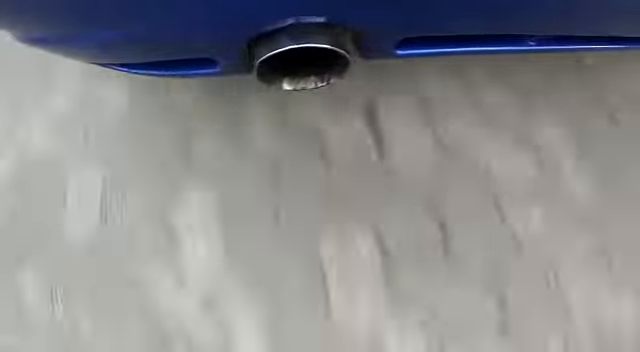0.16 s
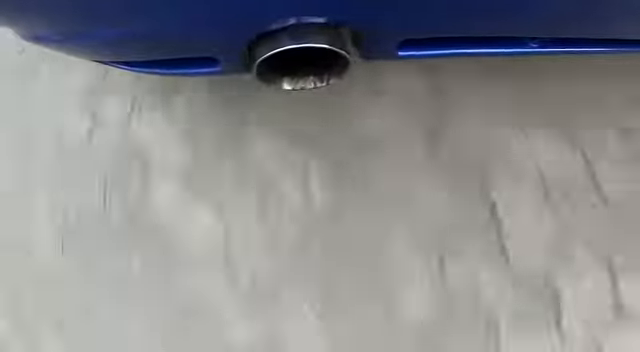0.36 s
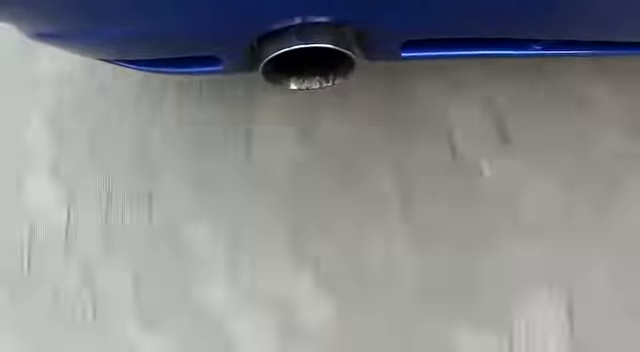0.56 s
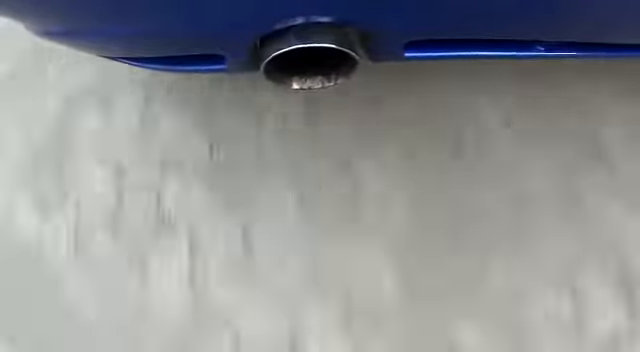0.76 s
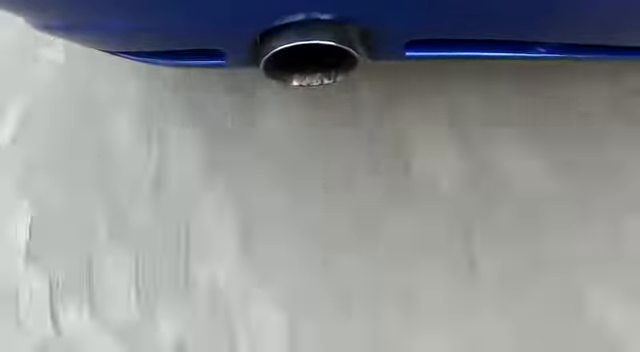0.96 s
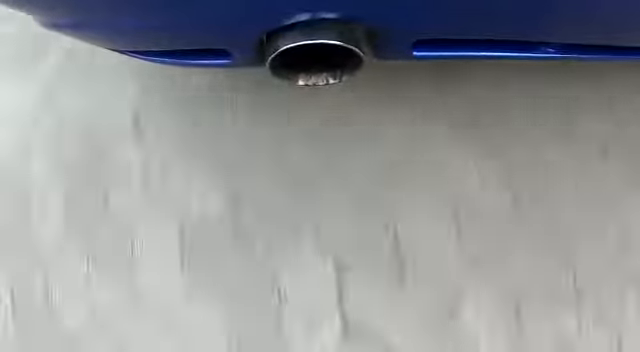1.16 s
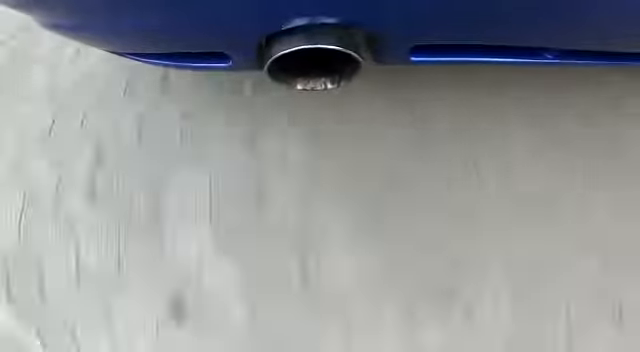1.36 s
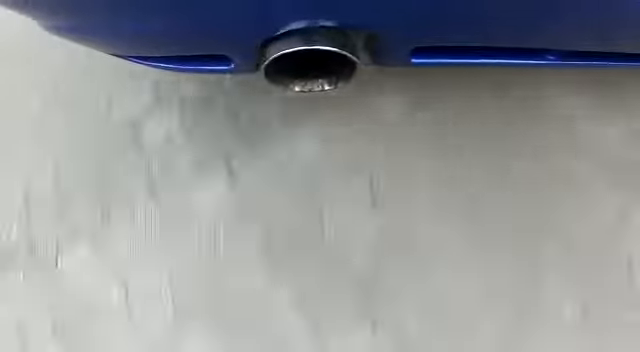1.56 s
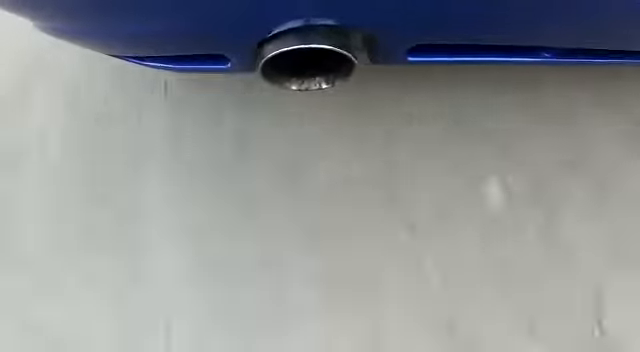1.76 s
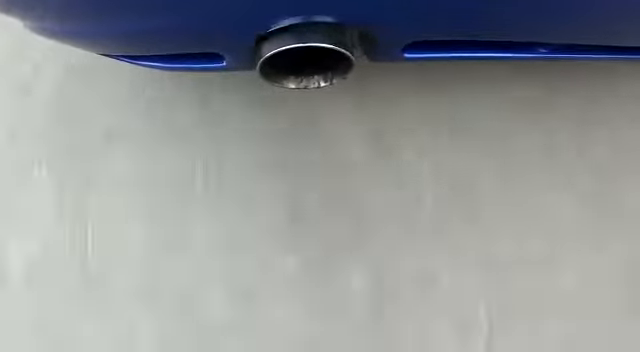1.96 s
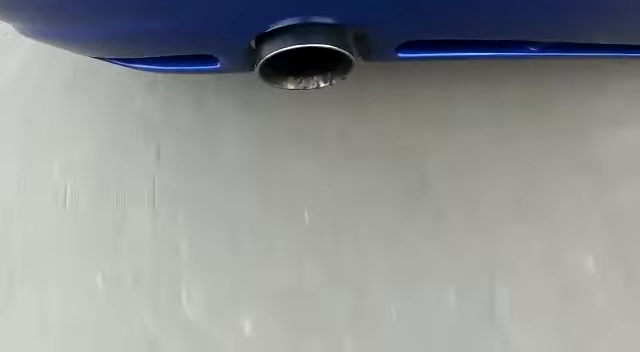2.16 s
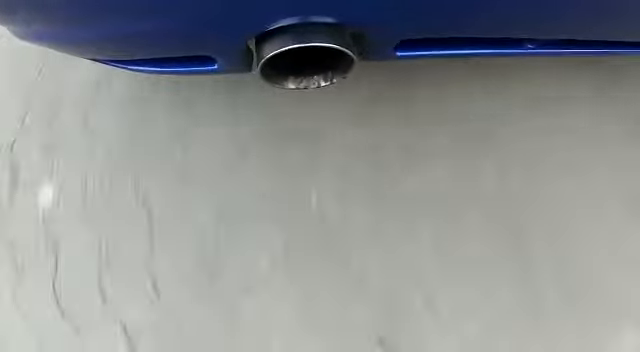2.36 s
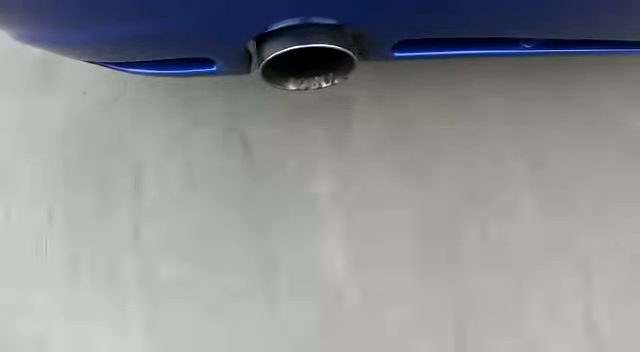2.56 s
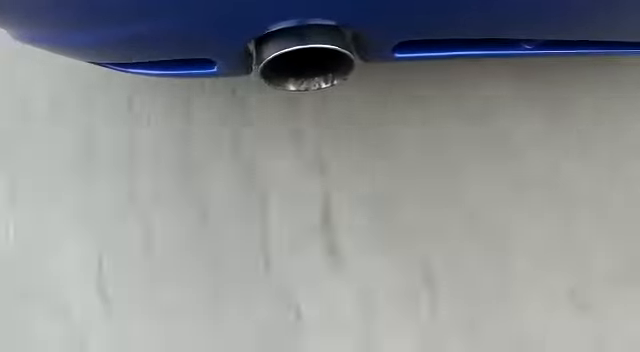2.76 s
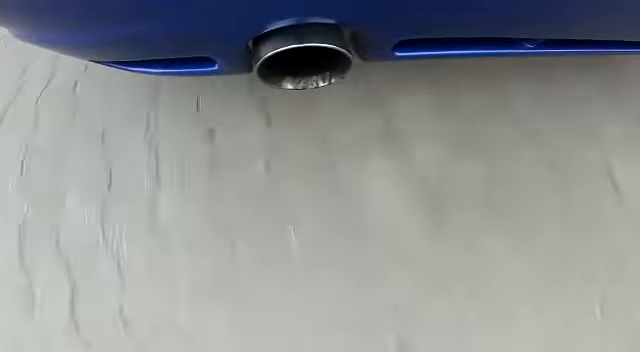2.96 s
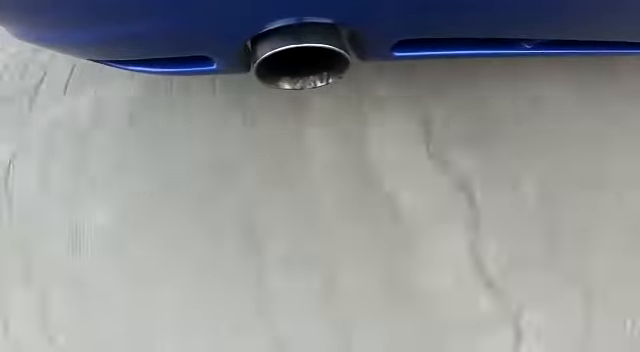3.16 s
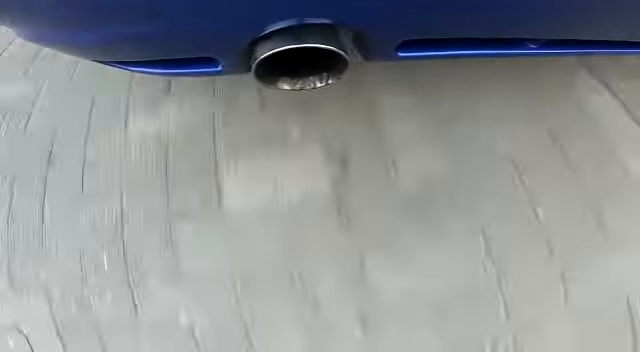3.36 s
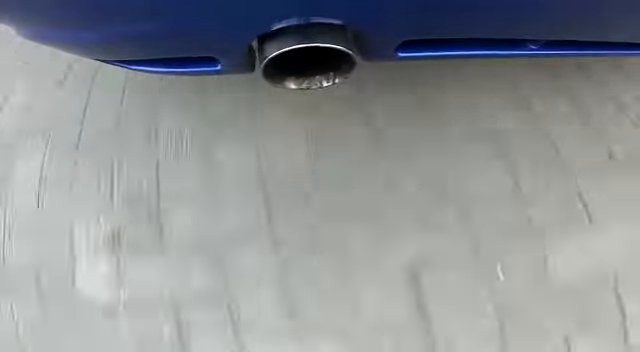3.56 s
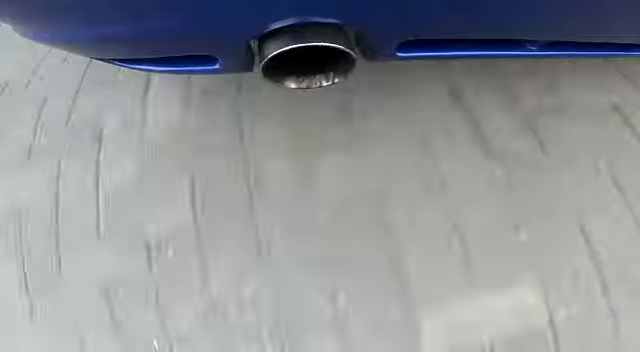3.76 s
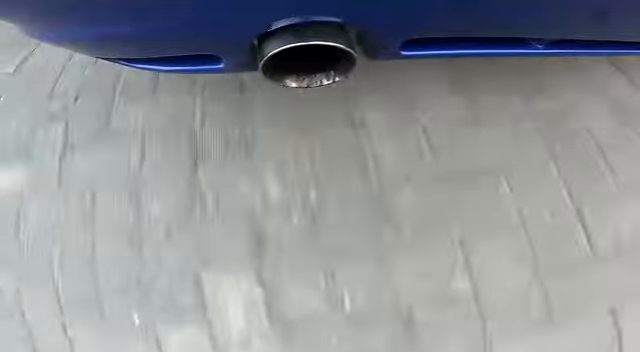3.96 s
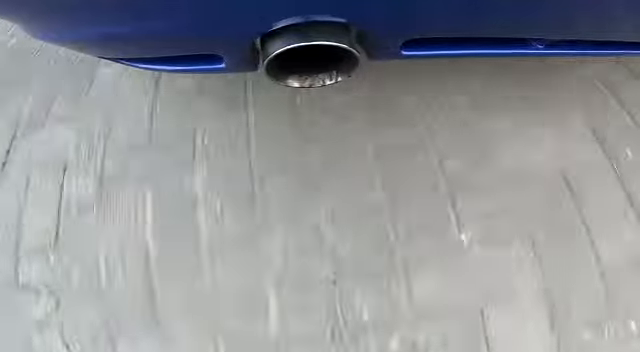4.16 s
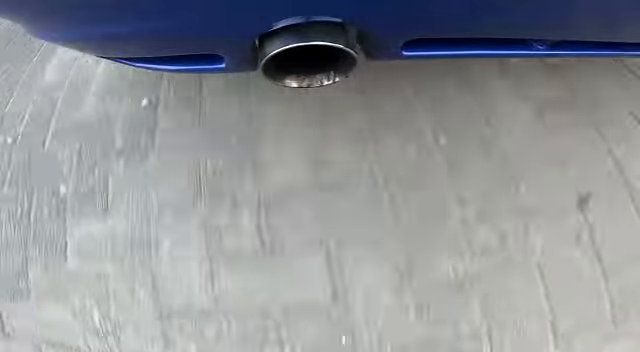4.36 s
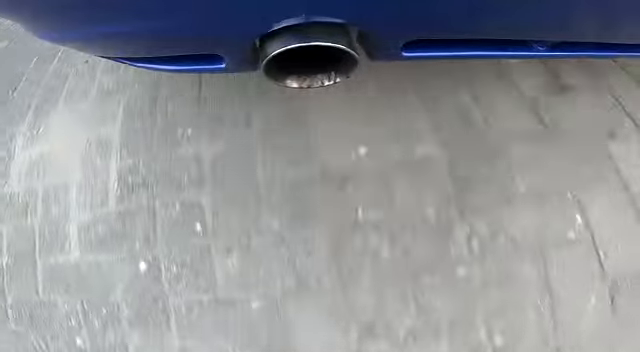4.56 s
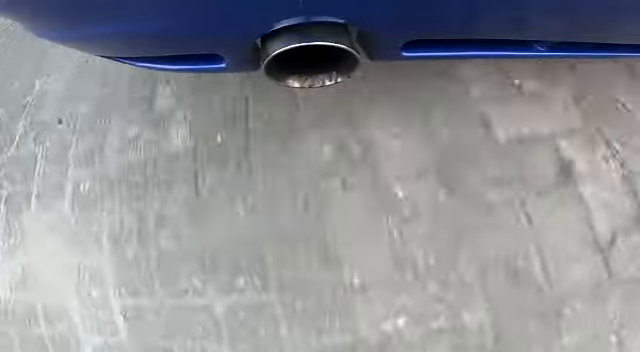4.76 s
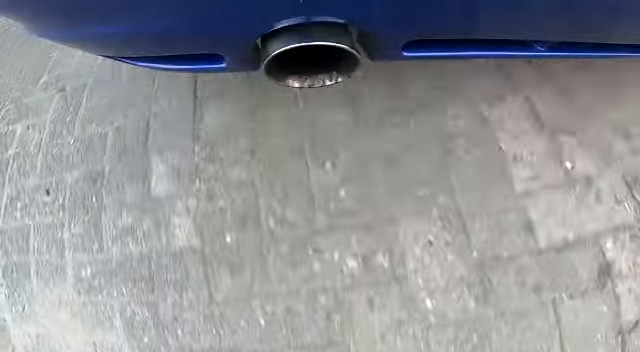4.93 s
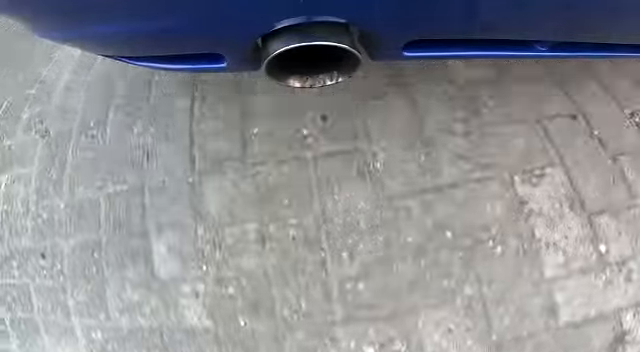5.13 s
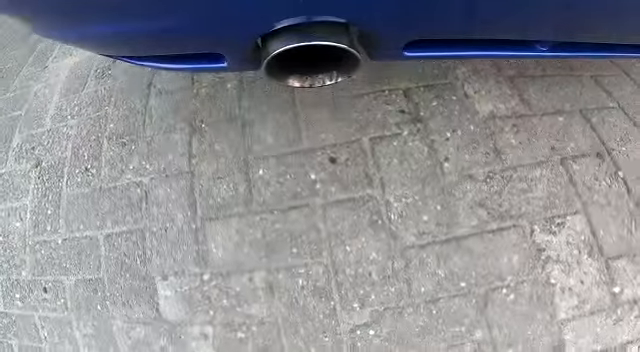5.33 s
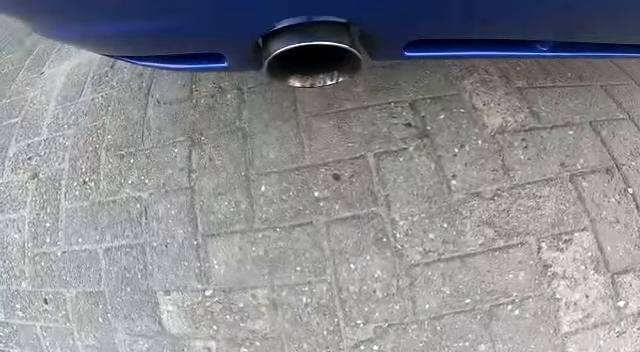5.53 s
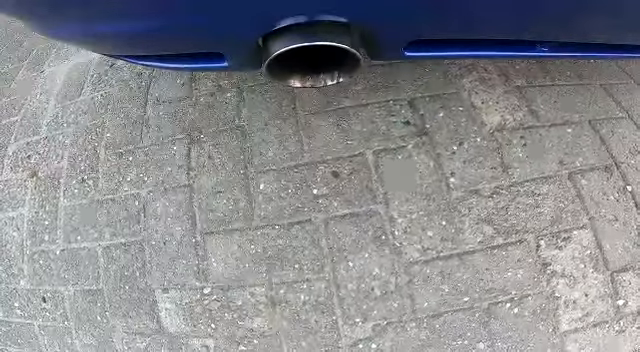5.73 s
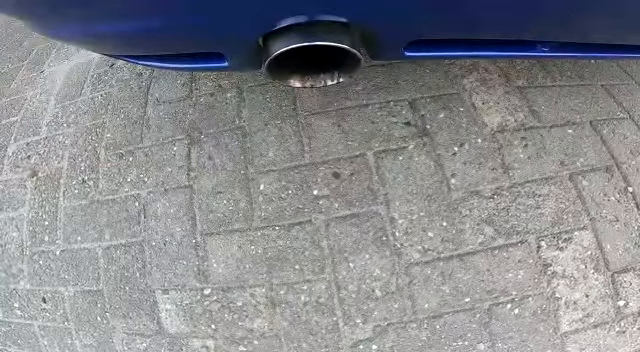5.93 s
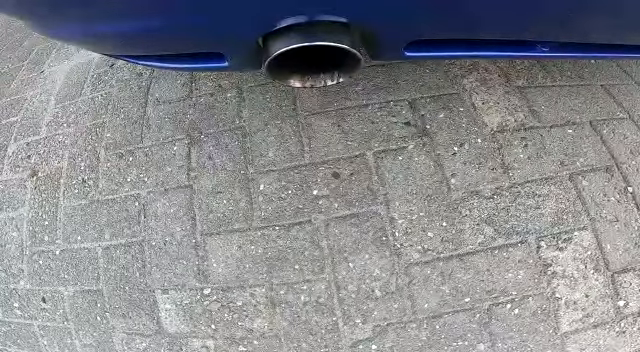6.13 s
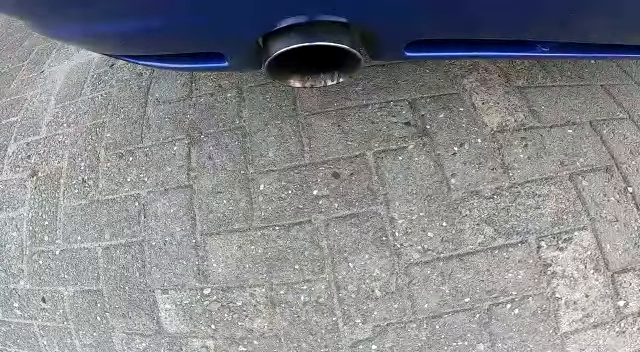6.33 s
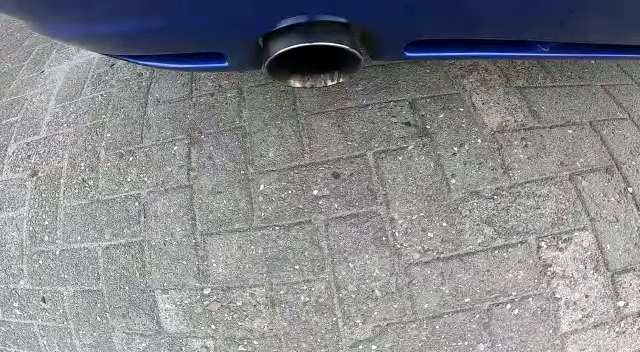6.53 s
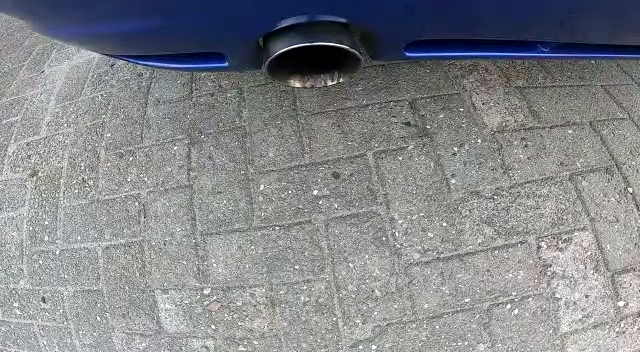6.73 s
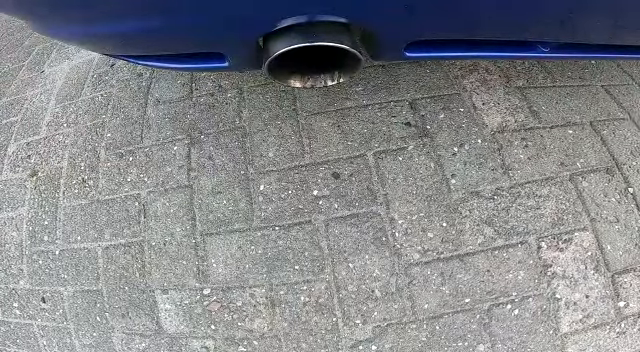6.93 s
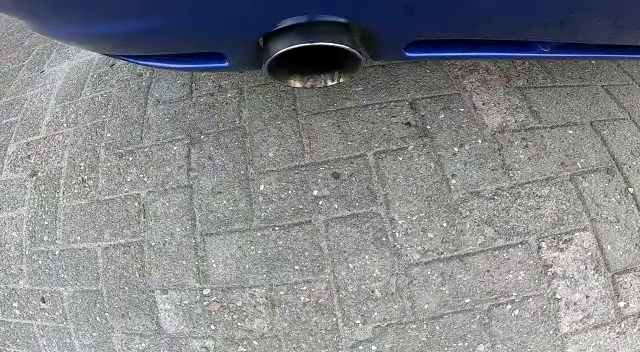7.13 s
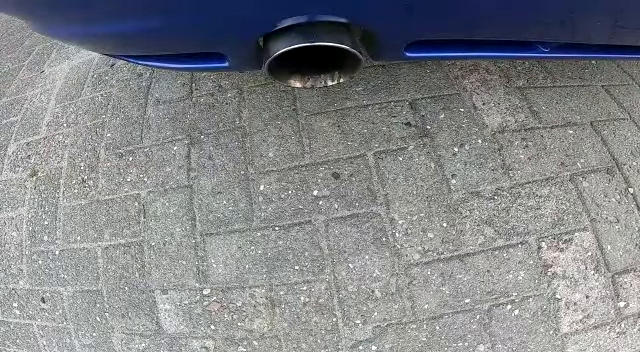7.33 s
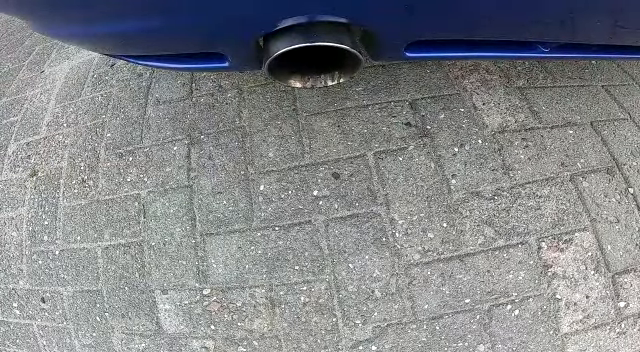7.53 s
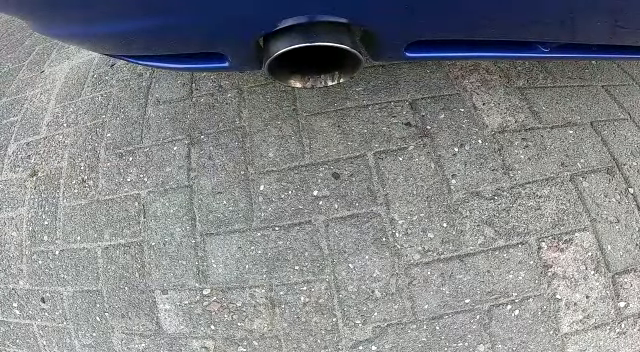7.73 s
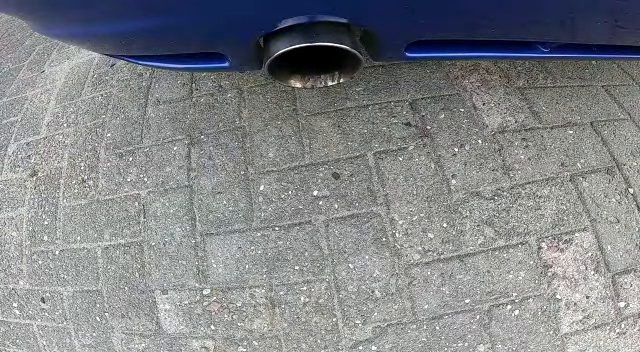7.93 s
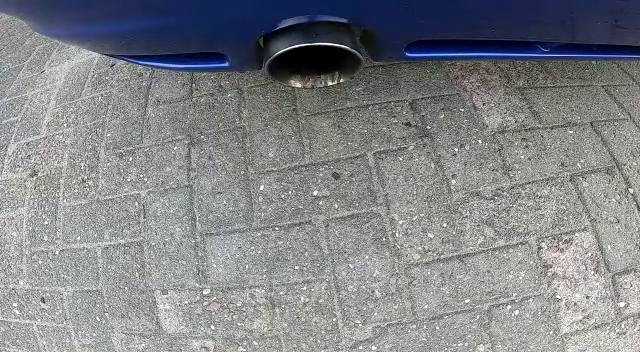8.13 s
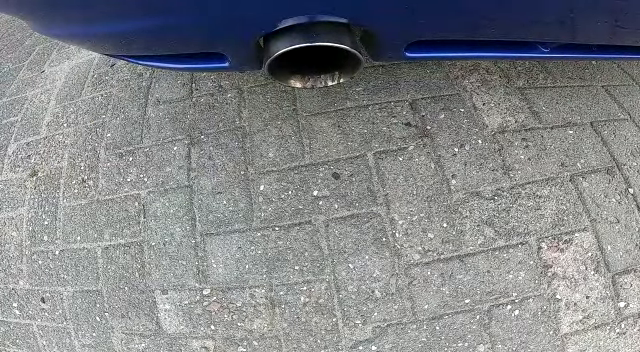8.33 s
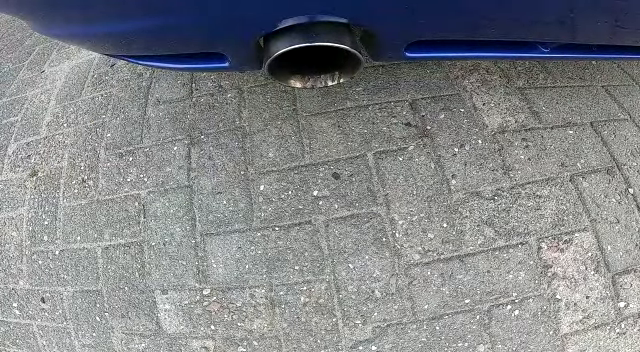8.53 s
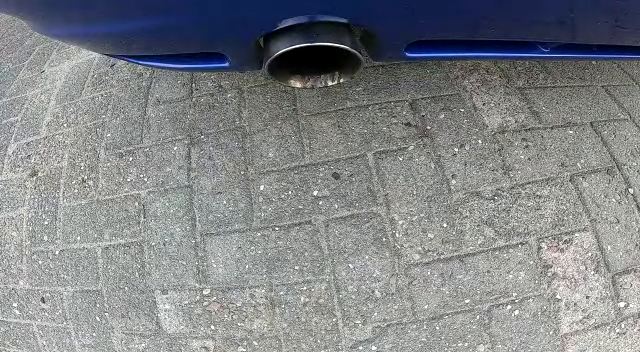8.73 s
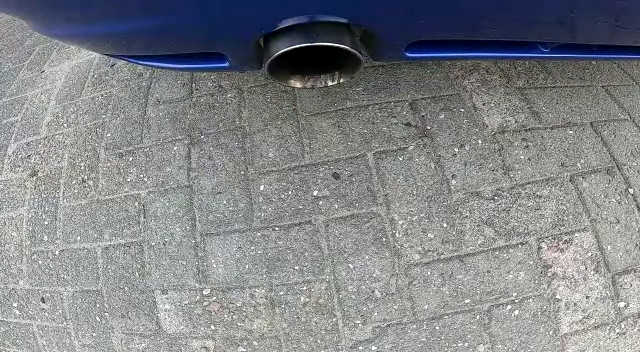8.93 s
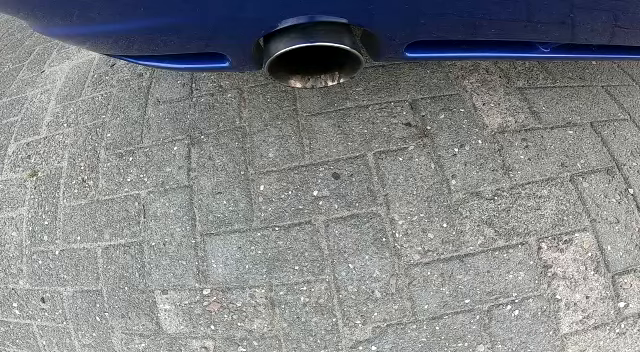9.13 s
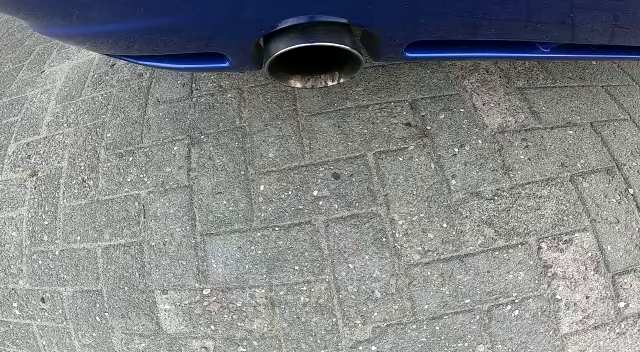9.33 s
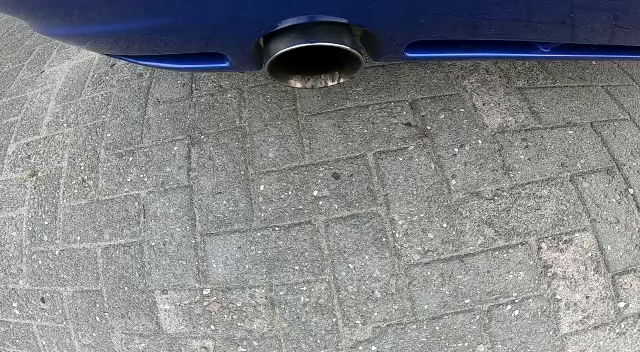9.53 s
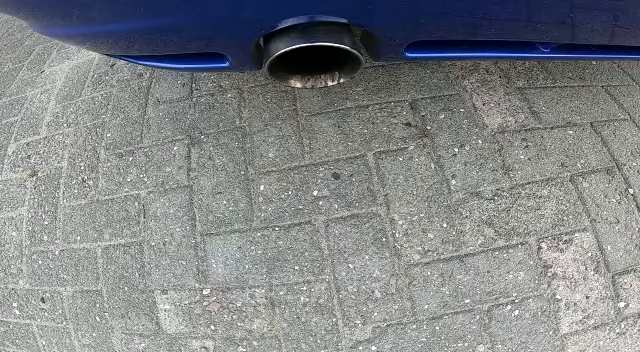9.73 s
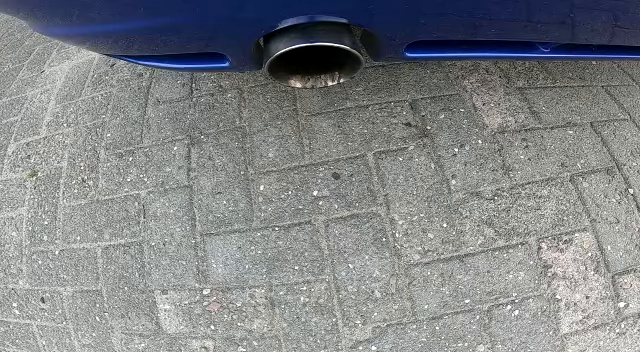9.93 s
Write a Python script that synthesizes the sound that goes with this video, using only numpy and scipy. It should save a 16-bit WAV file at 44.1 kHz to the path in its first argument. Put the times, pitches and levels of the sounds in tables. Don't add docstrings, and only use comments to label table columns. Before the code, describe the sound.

Close exhaust drone falls in pitch while tyres hiss over paving; the car stops, burbles unevenly at idle, cuts out and rocks to rest.

```python
import sys
import numpy as np
from scipy import signal
from scipy.fft import rfft, irfft, next_fast_len
from scipy.io import wavfile
from scipy.ndimage import map_coordinates

SR = 44100
rng = np.random.default_rng(int(sys.argv[2]) if len(sys.argv) > 2 else 0)


def generate_wav(sig):
    pcm = np.round(np.clip(np.atleast_2d(sig).T, -1, 1) * 32767).astype(np.int16)
    wavfile.write(sys.argv[1], SR, pcm)


def boost(x):
    u = np.asarray(x, float) / 20
    return 10 ** u


N = 440559
LEAD_S = 0.1


def unit(x):
    return x / np.sqrt(np.mean(x ** 2) + 1e-20)


def curves(rows, t):
    s, *cols = np.transpose(rows)
    return np.array([np.interp(t, s, c) for c in cols])


def filtered(x, response):
    m = next_fast_len(N + SR // 2)
    return irfft(rfft(x, m) * response(np.fft.rfftfreq(m, 1 / SR)), m)[..., :x.shape[-1]]


def resonant(x, modes, top_hz):
    def response(f):
        ring = sum(g * 1j * f * w / (c * c - f * f + 1j * f * w) for c, w, g in modes)
        u = f / top_hz
        return ring / (1 - u ** 2 + 1j * np.sqrt(2) * u) ** 2 / (1 + (u / 1.25) ** 8)
    return filtered(x, response)


def noise(spectrum):
    hz, db = np.transpose(spectrum)
    return unit(filtered(rng.standard_normal(N), lambda f: boost(np.interp(np.log(f + 1), np.log(hz), db))))


def wobble(rate_hz):
    return map_coordinates(rng.standard_normal(int(N * rate_hz / SR) + 4), [np.arange(N) * rate_hz / SR])


def impulses(s, size):
    return np.bincount(np.round((s + LEAD_S) * SR).astype(int), size, N + round(LEAD_S * SR))


def even_rms(s, flat, modes, top_hz, span):
    return np.std(resonant(impulses(s, flat), modes, top_hz)[span])


# time in seconds, firings per second.
ROLLING = [(0.0, 81.2), (0.26, 80.3), (0.72, 74.6), (1.38, 73), (1.57, 67.6), (1.76, 71), (2.3, 68.5),
           (3.01, 63.4), (3.3, 58), (3.77, 46.2), (4.01, 41.4)]
# time in seconds, firings per second.
IDLE = [(4.27, 37.25), (4.55, 37.123), (4.95, 36.305), (5.75, 35.77), (6.65, 34.53), (7.5, 34.889),
        (8.87, 34.772)]
FIRST_FIRES_S = 7.487


def rotation(t):
    rate = curves(ROLLING + IDLE, t)[0]
    turn = np.cumsum(rate) / SR
    return rate, turn - np.interp(FIRST_FIRES_S, t, turn)


# time in seconds, cylinder pressure in dB, gas speed in dB.
THROTTLE = [(0, -14.5, -30.5), (0.74, -12, -26.5), (0.84, -10, -17.5), (1.02, -11.5, -20.5),
            (1.12, -17.5, -34.5), (1.33, -15, -28.5), (1.4, -10, -16.5), (2.05, -13.5, -21),
            (2.3, -16, -22.5), (2.95, -19.5, -21.5), (3.5, -17, -24.5), (3.83, -16, -24), (3.9, -27.5, -40),
            (4.22, -22, -36.5), (4.32, -9.5, -27), (4.6, -12, -36), (6.1, -13.5, -35), (6.7, -15.5, -37),
            (8.85, -18.5, -37)]
# from and to in seconds, push loss in dB.
COASTING = [
    (0.795, 1.468, -11),
    (1.47, 1.749, -6),
    (1.747, 2.576, -12),
    (2.606, 4.01, -14.5),
]
# time in seconds, loss in dB, half length in seconds.
STUMBLES = [
    (2.99, -14.5, 0.021),
    (3.384, -6.5, 0.022),
    (4.178, -6, 0.13),
    (5.859, -2.5, 0.053),
    (8.367, -1.5, 0.037),
]
PUSH_DB, LIFT_S = -18.5, 0.11
CRACK_DB, CRACK_FOLLOWS = -53, 0.34
KNOCK_TOP_DB, KNOCK_DB, EDGE_DB = -15, -14, -9


def strength(t):
    weak_db = sum(db * np.exp(-((t - s) / half) ** 2) for s, db, half in STUMBLES)
    pressure_db, speed_db = curves(THROTTLE, t)
    off_db = sum(db * np.clip(np.minimum(t - a, b + LIFT_S - t) / LIFT_S, 0, 1) for a, b, db in COASTING)
    crack_db = CRACK_DB + CRACK_FOLLOWS * (speed_db + 19.5)
    return np.array([
        PUSH_DB + off_db + 1.8 * weak_db,
        pressure_db + weak_db,
        speed_db + 1.2 * weak_db,
        crack_db,
        np.minimum(pressure_db, KNOCK_TOP_DB) + weak_db + KNOCK_DB,
        crack_db + EDGE_DB])


# push, boom, bark and crack in dB.
CYLINDERS = [(0, -12, -6.5, 10), (0, -5.5, 0, 5.5), (-1.6, 1, -7, -3), (-.6, -.6, 4.5, -6), (0, 0, 3, 2.5),
             (-.4, -13, 2.5, -.5)]
HABITS = [(-14, 8), (-7, 6.5), (0, -5), (1, -6), (1, -6), (-9, 2)]
AT_SPEED = [(2, 0.5), (0.5, -6.5), (-2, -3), (-2.5, 2), (-3, -2), (1, -0.3)]
# time in seconds, share 0-1.
LOPE = [(0, 0.08), (3, 0.06), (4.3, 0), (6, 0.09), (6.8, 0.92), (8.8, 1)]
FAST_PUSH_DB, FAST_KNOCK_DB, FAST_EDGE_DB = 2.5, -13.5, -1.5
COAST_PUSH_SCATTER_DB = 1.5
MISFIRE_S, MISFIRE_DB = 8.349, -9


def firing_levels(s, number, fast, even, chance):
    scatter_db = chance[:, :6] * [1.2, 1.6, 1.8, 1.4, 2, 2] * even[:, None]
    lope = np.clip(curves(LOPE, s).T, 0.01, 1) ** np.array([0.95, 0.28, 0.6, 0.076, 0.53, 0.04])
    level_db = strength(s).T + lope * np.hstack([CYLINDERS, HABITS])[number % 6] + scatter_db
    level_db[:, 1:3] += fast[:, None] * np.array(AT_SPEED)[number % 6]
    coasted = s > COASTING[0][1] - 0.5
    level_db[:, 0] += fast * (FAST_PUSH_DB + COAST_PUSH_SCATTER_DB * chance[:, 0] * coasted)
    level_db[np.argmin(np.abs(s - MISFIRE_S)), [3, 5]] += MISFIRE_DB
    level_db[:, 4:] += fast[:, None] * [FAST_KNOCK_DB, FAST_EDGE_DB]
    return level_db


# Hz, width in Hz, signed gain.
BANK = [(242, 72, 1.1), (317, 120, -0.92)]
BANK_DB = -13


def joining_pipe(s, number, flat, fast, level_db):
    train = impulses(s, (number % 3 == 0) * flat * fast * boost(level_db[:, 0] + BANK_DB))
    return resonant(train, BANK, 400)[-N:] / even_rms(s[::3], flat[::3], BANK, 600, slice(SR))


# Hz, width in Hz, signed gain.
HOT = [(134.2, 38.8, 0.77), (227, 73, -0.12), (322.7, 26, 0.2)]
HOT_DB = -3.5


def hot_pipe(s, flat, fast, boom_db):
    train = impulses(s, flat * fast * boost(boom_db + HOT_DB))
    train = filtered(train, lambda f: 1 / (1 + (105 / (f + 1)) ** 6))
    return resonant(train, HOT, 350)[-N:] / even_rms(s, flat, HOT, 320, slice(SR))


# Hz, width in Hz, signed gain.
PUSH = [(32, 12, .125), (87, 50, -.25), (124, 12, -1)]
BOOM = [(130.5, 29.6, 0.8), (141.4, 22.4, -0.6), (198, 29, -0.067), (233, 24, -0.0039)]
BARK = [(187, 63, -0.31), (245.2, 27.5, 0.55), (307, 28, 0.11), (388.2, 40.6, 0.69), (409.2, 20.5, -0.84)]
CRACK = [(505, 110, -0.15), (717, 100, 0.93)]
KNOCK = [(197.6, 37, 2.1), (230, 14, 1.4)]
EDGE = [(840, 68, 0.96), (1120, 55, -0.67)]
# time in seconds, crack peak in dB, boom over crack in dB.
RUNDOWN = [(8.868, -38, 29), (8.897, -45.5, 38), (8.934, -42, 35.5), (8.976, -44.5, 37),
           (8.998, -47.5, 35.5), (9.019, -43.5, 37), (9.042, -51, 32.5), (9.088, -45, 30.5),
           (9.062, -41.5, 33), (9.119, -40.5, 26), (9.146, -43, 22), (9.188, -44.5, 30), (9.238, -54, 19),
           (9.287, -49, 10)]
IGNITION_OFF_S = 8.85
HUSH_DB, HUSH_AT, HUSH_HALF = -6.5, 0.44, 0.24


def exhaust_pipe(t, turn, s, pace, flat, even, chance, level_db):
    late_s, late_db, boom_db = np.transpose(RUNDOWN)
    low_db = late_db + boom_db
    late = np.transpose([low_db - 14.0, low_db - 22.5, late_db - 18.0, late_db - 22, low_db - 46, late_db - 25.5])
    gust = (t < IGNITION_OFF_S) * np.exp(-((turn % 6 - HUSH_AT) / HUSH_HALF) ** 2)
    hush = boost(HUSH_DB * curves(LOPE, t)[0] * gust)
    # modes, top Hz, idle timing scatter in seconds, echo share, stilled by the gust.
    parts = [(PUSH, 168, 0, 0, False), (BOOM, 290, 0, 0, True), (BARK, 425, 0.0003, 0.5, True),
             (CRACK, 820, 0.00012, 0.12, False), (KNOCK, 270, 0, 0.3, True), (EDGE, 1150, 0.00004, 0.3, False)]
    sound = np.zeros(N)
    for k, (modes, top_hz, jitter_s, echo, stilled) in enumerate(parts):
        scale = even_rms(s, flat, modes, top_hz, slice(6 * SR, 8 * SR))
        shift_s = jitter_s * chance[:, 6] * (pace / 35) ** (k - 1) * even
        train = impulses(s + shift_s, flat * boost(level_db[:, k])) + impulses(late_s, 0.4 * boost(late[:, k]))
        train = train + echo * np.roll(train, round(0.0111 * SR))
        sound += (hush if stilled else 1) * resonant(train, modes, top_hz)[-N:] / scale
    return sound


# multiple of the firing rate, dB pulling, dB coasting.
THIRDS = [(4 / 3, -25, -20), (5 / 3, -7, -24), (7 / 3, -24.5, -22), (8 / 3, -21.5, -19), (3, -21, -22),
          (10 / 3, -19.5, -28), (11 / 3, -19, -21.5), (13 / 3, -31.5, -25.5), (14 / 3, -30.5, -20.5),
          (16 / 3, -22.5, -17), (17 / 3, -29, -18)]
# time in seconds, dB.
SING = [(0, -18.5), (0.74, -13), (0.9, -25), (1.15, -32.5), (1.5, -23.5), (1.8, -14), (2.9, -18.5),
        (3.4, -15.5), (3.84, -20.5), (3.92, -40), (4.25, -46)]


def manifold(t, rate, turn):
    coast = np.interp(t, COASTING[0][:2], [0, 1])
    song = np.zeros(N)
    for multiple, pull_db, coast_db in THIRDS:
        level = boost(pull_db + coast * (coast_db - pull_db) + 1.6 * wobble(16))
        song += level * np.sin(2 * np.pi * (multiple * turn + rng.random()))
    return boost(curves(SING, t)[0]) * (rate > 38) * song


# Hz, dB per Hz.
GAS = [(35, -44), (60, -9.5), (86, -15.5), (139, -32), (187, -9), (396, -1), (550, -34.5), (695, -19),
       (839, -42.5), (2500, -55.5), (3250, -102), (5500, -120)]
# Hz, dB per Hz.
FLOW = [(450, -28.5), (560, 0), (690, 6.5), (780, -9), (870, -14.5), (1050, -6.5), (1200, -19),
        (1600, -18.5), (2500, -37)]


def gas_noise(t, rate, turn):
    puff = unit(np.exp(0.48 * np.cos(2 * np.pi * (turn - 0.2))))
    running = np.interp(t, [IGNITION_OFF_S, 9.3], [1, 0])
    bark_db, crack_db = strength(t)[2:4]
    flow = boost(bark_db - 6.0 - 2.3 * (rate > 44)) * noise(GAS)
    jet = boost(crack_db + 0.9 + 1.9 * (rate > 40)) * noise(FLOW)
    return running * puff * (flow + jet)


# time in seconds, share of full scatter.
STEADY = [(0.74, .3), (0.84, .7), (1.6, .7), (1.75, .5), (2.9, .55), (3.1, .75), (4.2, .7), (4.4, .65)]
COLD_LOSS_DB = -5.5


def engine():
    t = np.arange(N) / SR
    rate, turn = rotation(t)
    number = np.arange(np.ceil(turn[0]) - 6, np.interp(IGNITION_OFF_S, t, turn)).astype(int)
    s = np.interp(number, turn, t) + np.minimum(number - turn[0], 0) / rate[0]
    pace = np.interp(s, t, rate)
    flat = pace ** -0.5
    fast = np.interp(pace, [37.4, 39.5], [0, 1])
    even = curves(STEADY, s)[0]
    chance = rng.standard_normal((len(s), 7))
    level_db = firing_levels(s, number, fast, even, chance)
    sound = joining_pipe(s, number, flat, fast, level_db) + hot_pipe(s, flat, fast, level_db[:, 1])
    level_db[:, 1] += fast * COLD_LOSS_DB
    sound += exhaust_pipe(t, turn, s, pace, flat, even, chance, level_db)
    sound += manifold(t, rate, turn) + gas_noise(t, rate, turn)
    return sound + clank(s, flat, fast, level_db[:, 4]) + unburnt_strokes()


# Hz, dB per Hz.
ROAR = [(700, -31.5), (950, 6.5), (1250, -7), (1600, -2.5), (1900, -13.5), (2600, -48.5)]
ROAR_DB = -54.5


def intake():
    t = np.arange(N) / SR
    pulling = np.clip((COASTING[0][0] + LIFT_S - t) / LIFT_S, 0, 1)
    return pulling * boost(ROAR_DB + 1.7 * wobble(25)) * noise(ROAR)


# time in seconds, dB.
ROAD = [(0, -60.5), (0.4, -60), (1.1, -62.5), (1.55, -56), (2.3, -60), (3.25, -58), (3.45, -58),
        (4.2, -54.5), (4.9, -62), (5.5, -64), (6.5, -66.5), (8.1, -70), (8.8, -68), (9.1, -61), (9.25, -73),
        (9.6, -80), (9.99, -77)]
# Hz, dB per Hz.
HISS = [(590, -28), (1000, 3.5), (1320, -1), (1770, 0.5), (1920, -5), (2210, -1.5), (3300, -5.5),
        (3490, -2.4), (3700, -7.5), (6700, -7.5), (8450, -15.5), (11000, -59), (18600, -120)]
# time in seconds, rise in dB, half length in seconds.
BUMPS = [(0.06, 5, 0.015), (0.21, 5.5, 0.033), (0.3, 5.5, .02), (0.7, 4, 0.021), (3.36, 5.5, 0.064),
         (3.46, 10, 0.038), (3.61, 6.5, 0.055), (3.71, 7.5, 0.027), (3.81, 5, 0.03), (4.08, 6, 0.014),
         (4.19, 1.5, .025), (4.84, 6, 0.014), (5.68, 4.5, 0.1), (5.94, 7, .035), (6.64, 2.5, .04),
         (6.72, 12, 0.043), (6.85, 4, 0.062), (7.21, 5.5, .025), (7.46, 5.5, 0.022), (7.7, 3.5, 0.068),
         (8.2, 7.5, 0.053), (8.44, 2.5, 0.03), (8.77, 13, 0.02), (8.9, 1, 0.025), (9.44, 11, 0.02),
         (9.67, 16, 0.028), (9.77, 4, 0.033), (9.88, 7, 0.027)]
# time in seconds, rise in dB.
JOINTS = [(1.635, 3.5), (1.718, 6), (1.825, 5), (1.942, 5), (2.047, 5.5), (2.145, 5), (2.24, 3.5),
          (2.392, 5.5), (2.506, 5.5), (2.621, 7.5), (2.721, 6.5), (2.83, 5.5), (2.95, 5)]
# time in seconds, dB.
RUMBLE = [(0, -32), (1, -36.5), (2, -33), (3, -24), (4, -27.5), (5, -22), (5.6, -49), (9.99, -76)]
JOINT_S = 0.032


def road():
    t = np.arange(N) / SR
    bumps = BUMPS + [(s, db, JOINT_S) for s, db in JOINTS]
    swell_db = sum(db * np.exp(-((t - s) / half) ** 2) for s, db, half in bumps)
    hiss = boost(curves(ROAD, t)[0] + swell_db + 0.53 * wobble(16) + 1.0 * wobble(45)) * noise(HISS)
    low = noise([(12, -27.5), (28, -9.5), (60, 1.0), (110, 3.5), (200, -6.0), (400, -67.0)])
    return hiss + boost(curves(RUMBLE, t)[0] + 1.6 * wobble(9.7)) * low


# Hz, dB per Hz.
STREET = [(15, -50), (25, -14), (189, 2), (538, -18.5), (795, -14.5), (966, -25.5), (1690, -32),
          (3970, -41.5), (4940, -28), (8450, -46.5), (11000, -68), (18600, -120)]


def street():
    return boost(-62.5 + 0.96 * wobble(25)) * noise(STREET)


# Hz, dB.
WHINE = [(11560, -106), (11830, -103), (12760, -111), (13040, -112)]


def electrical_whine():
    t = np.arange(N) / SR
    tones = sum(boost(db + 2.5 + 2.5 * wobble(60)) * np.sin(2 * np.pi * hz * t + 1.5 * wobble(70)) for hz, db in WHINE)
    return tones * (t < 9.22)


# time in seconds, peak in dB.
GRIT = [(0.0582, -46), (0.228, -54), (0.2813, -51), (0.3353, -49.5), (0.5037, -57.5), (0.698, -43),
        (0.8866, -44.5), (0.9018, -40.5), (0.945, -51), (1.044, -55), (1.3902, -50), (3.13, -58),
        (1.6931, -56), (4.141, -55), (4.3645, -53), (4.7835, -53), (4.8957, -47), (5.0716, -53),
        (5.1731, -57.5), (6.311, -65.5), (9.1222, -53.5), (5.2001, -53)]


def grit():
    out, t = np.zeros(N + SR), np.arange(SR // 50) / SR
    for s, db in GRIT:
        out[round(s * SR):][:len(t)] += boost(db + 3.5 - 60 * t / 0.041) * rng.standard_normal(len(t))
    return resonant(out[:N], [(6450, 1400, 1.5)], 12000)


# time in seconds, peak in dB.
CLACKS = [(2.996, -45), (4.833, -43.5), (8.87, -49.5), (8.898, -50.5), (8.9726, -57), (8.9965, -49.5),
          (9.02, -50), (9.0449, -52), (9.0658, -46), (9.0893, -44.5), (9.1187, -39.5), (9.14, -41.5),
          (9.168, -52)]
# Hz, dB per Hz.
CLACK = [(900, -15), (1600, 1), (3300, 1.5), (5200, -2.5), (7000, -8.5), (8500, -23), (11000, -72)]
CLACK_RISE_S = 0.0036


def clacks():
    t = np.arange(N) / SR
    shape = np.zeros(N)
    for s, db in CLACKS:
        u = np.clip((t - s) / CLACK_RISE_S, 0, 40)
        shape += boost(db) * u * np.exp(1 - u)
    return 0.43 * shape * noise(CLACK)


# time in seconds, peak in dB, main ring in Hz.
RATTLES = [(3.311, -38, 5350), (3.4396, -33, 3600), (3.6054, -37.5, 4220), (3.981, -46, 3220),
           (4.8325, -33, 3370), (4.8305, -37, 6200), (5.2817, -50, 3600), (5.382, -47, 3460),
           (6.6036, -40.5, 2440), (6.636, -38.5, 6050), (6.689, -35, 3560), (6.696, -34, 4870),
           (6.7044, -35.5, 3300), (6.7117, -33, 2980), (6.7185, -37, 4950), (6.7258, -39, 2960),
           (6.7342, -32, 3640), (6.7418, -36, 4450), (6.751, -38, 2960), (6.765, -50, 4400),
           (7.194, -47, 4060), (7.4546, -49, 5060), (8.176, -53, 2840), (8.432, -50, 5120),
           (8.722, -46, 5260), (8.774, -58, 3540), (8.912, -48, 5100), (8.9386, -47, 5100),
           (9.1197, -46, 3250), (9.3162, -47.5, 4680), (9.7197, -41, 5100), (9.875, -49, 4920)]
METAL = [2770, 2920, 3500, 4640, 4920, 6460]
# time in seconds, peak in dB, Hz.
PINGS = [
    (6.6, -56, 2410),
    (6.78, -61, 2770),
    (6.848, -59, 2400),
    (6.902, -59.5, 4900),
    (7.072, -62, 5100),
]
RING_T60_S, TICK_T60_S, PING_T60_S = 0.08, 0.05, 0.22
SCRAPE_S, DETUNE = 0.0035, 0.01
RING_DB, DRY_DB, RUNG_DB, RING_WIDTH_HZ = -9, -1.5, 2, 160


def rattles():
    out, scrape, t = np.zeros(N + SR), np.zeros(N + SR), np.arange(SR // 5) / SR
    soft = 1 - np.exp(-t / SCRAPE_S)
    for s, db, hz in RATTLES:
        start = round(s * SR)
        others_hz = np.array(METAL)[:, None] * np.exp(rng.normal(0, DETUNE, size=(6, 1)))
        share = boost(rng.normal(-11.5, 1.7, size=(6, 1)))
        ring = np.sin(2 * np.pi * hz * t) + (share * np.sin(2 * np.pi * others_hz * t)).sum(0)
        out[start:][:len(t)] += boost(db + RING_DB - 60 * t / RING_T60_S) * ring * soft
        scrape[start:][:len(t)] += boost(db - 60 * t / TICK_T60_S) * rng.standard_normal(len(t)) * soft
    for s, db, hz in PINGS:
        out[round(s * SR):][:len(t)] += boost(db - 60 * t / PING_T60_S) * np.sin(2 * np.pi * hz * t) * soft
    rung = resonant(scrape[:N], [(hz, RING_WIDTH_HZ, (-1) ** k) for k, hz in enumerate(METAL)], 7300)
    return resonant(out[:N] + boost(DRY_DB) * scrape[:N] + boost(RUNG_DB) * rung, [(4200, 5200, 0.86)], 8000)


# Hz, width in Hz, gain.
CLANK = [(562, 60, 1)]
CLANK_DB, SMOOTH_CLANK_DB = -24.5, -12.5


def clank(s, flat, fast, knock_db):
    smooth_db = SMOOTH_CLANK_DB * (1 - curves(LOPE, s)[0])
    train = impulses(s, flat * (1 - fast) * boost(knock_db + CLANK_DB + smooth_db))
    return resonant(train, CLANK, 480)[-N:] / even_rms(s, flat, CLANK, 570, slice(6 * SR, 8 * SR))


# Hz, width in Hz, signed gain.
EMPTY = [(76, 30, 0.66), (248.5, 12, -0.48)]
EMPTY_DB = -13


def unburnt_strokes():
    s, crack_db, boom_db = np.transpose(RUNDOWN)
    train = impulses(s, boost(crack_db + boom_db + EMPTY_DB))
    return resonant(train, EMPTY, 330)[-N:] / np.max(resonant(impulses(s[:1], [1]), EMPTY, 330))


# time in seconds, peak in dB, Hz, t60 in seconds.
THUDS = [
    (9.271, -43, 127, 0.32),
    (9.492, -43, 252.4, 0.21),
    (9.527, -46, 137, 0.25),
    (9.651, -53, 147.8, 0.56),
    (9.88, -69, 147, 0.055),
    (9.89, -62, 351, 0.17),
    (9.932, -62, 171, 0.22),
]


def thuds():
    out, t = np.zeros(N + SR), np.arange(SR // 2) / SR
    puff = noise([(80, 4.5), (150, 12.0), (300, 3.5), (550, -12.5), (1200, -70), (3000, -75.0)])
    for s, db, hz, t60 in THUDS:
        start = round(s * SR)
        body = np.sin(2 * np.pi * hz * t) + 0.65 * puff[start - len(t):start]
        out[start:][:len(t)] += boost(db + 7.5 - 60 * t / t60) * (1 - np.exp(-t / 0.0015)) * body
    return out[:N]


SWAY_S, LURCH_DB, LURCH_T60_S, SETTLE_DB, SETTLE_T60_S = 9.3, -22, 0.14, -42, 1.13


def sway():
    since = np.arange(N) / SR - SWAY_S
    after = np.abs(since)
    fade = boost(LURCH_DB - 60 * after / LURCH_T60_S) + boost(SETTLE_DB - 60 * after / SETTLE_T60_S)
    return np.clip(1 + since / 0.029, 0, 1) * fade * noise([(12, -50), (30, 20), (75, 29), (120, -12), (200, -47.0)])


def scene():
    car = engine() + intake() + road() + rattles() + clacks() + grit() + thuds() + sway()
    return (car + street())[None]


def roll_off(x):
    return signal.sosfilt(signal.butter(12, 14400, fs=SR, output="sos"), x)


OVERLOAD = 0.56


def record(dry):
    soft = dry / (1 + np.abs(dry / OVERLOAD) ** 4) ** 0.25
    dull = filtered(soft, lambda hz: 1 / (1 + (hz / 9000) ** 6))
    return roll_off(dull + electrical_whine())


dry = scene()
out = record(dry)
generate_wav(out)
```